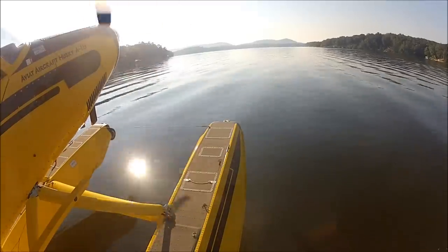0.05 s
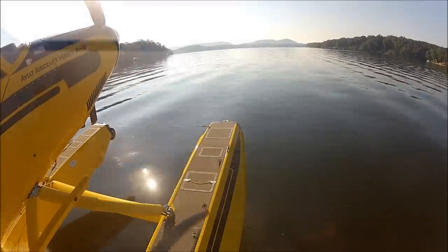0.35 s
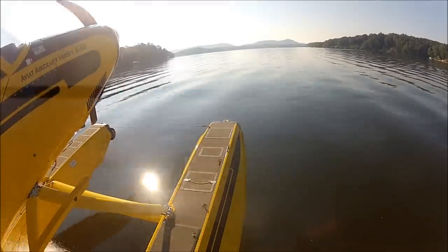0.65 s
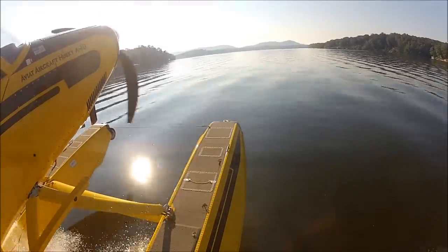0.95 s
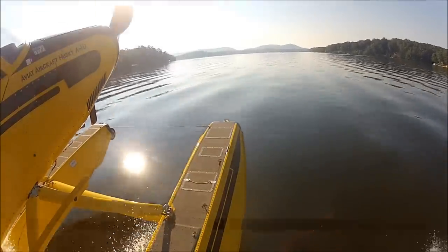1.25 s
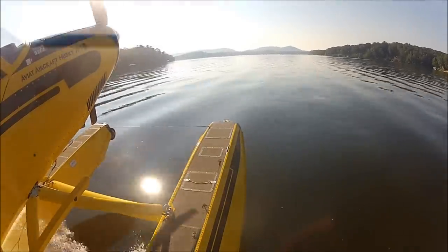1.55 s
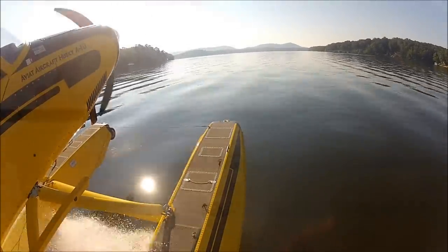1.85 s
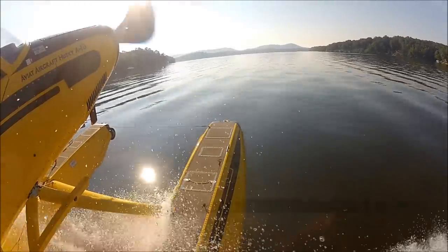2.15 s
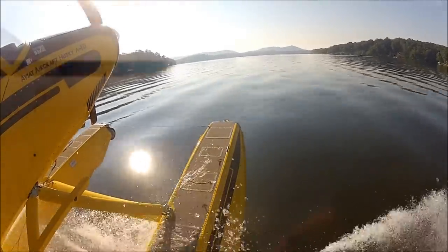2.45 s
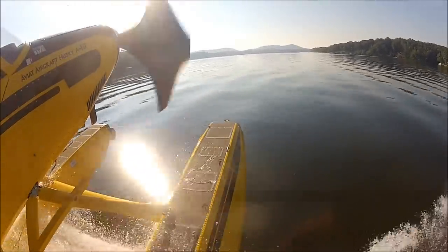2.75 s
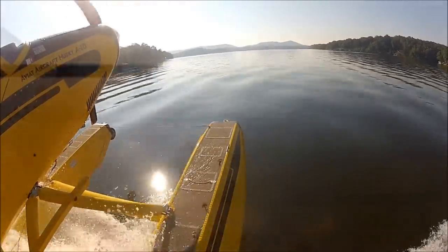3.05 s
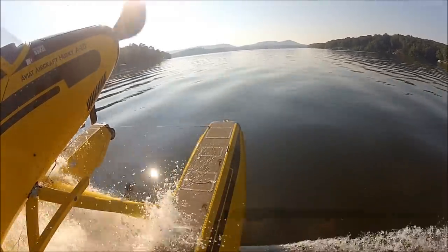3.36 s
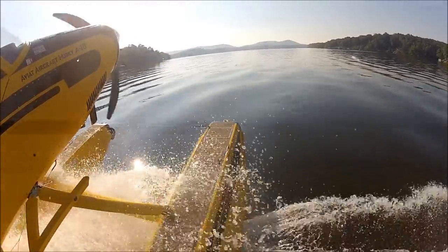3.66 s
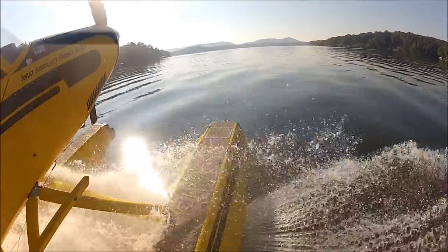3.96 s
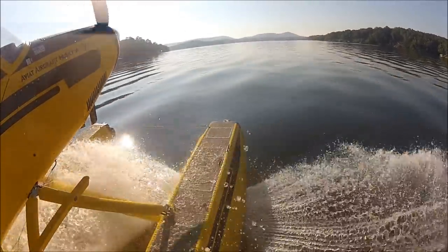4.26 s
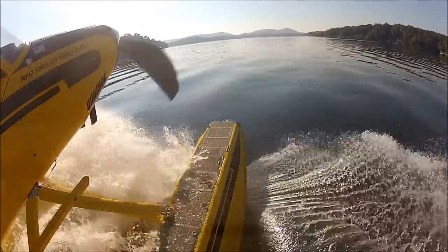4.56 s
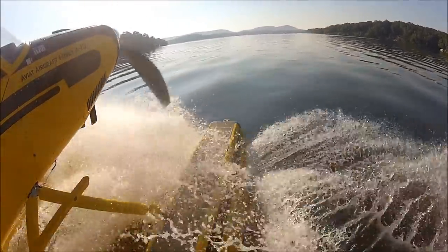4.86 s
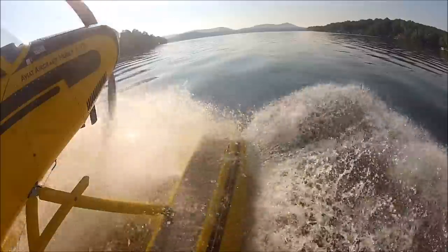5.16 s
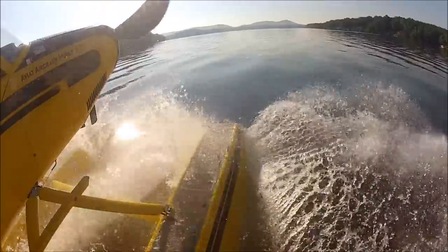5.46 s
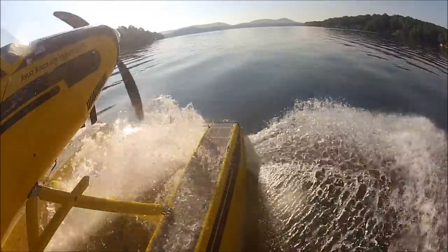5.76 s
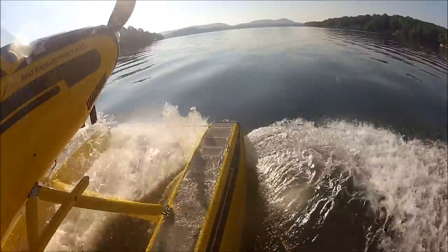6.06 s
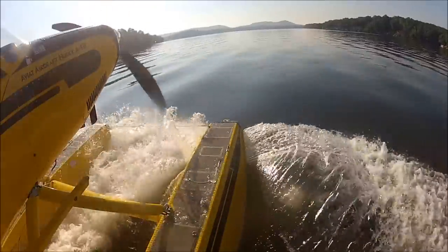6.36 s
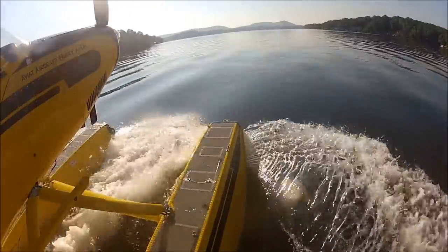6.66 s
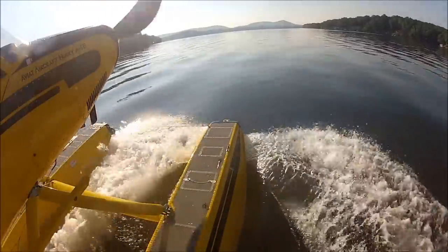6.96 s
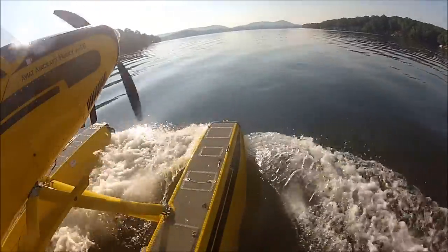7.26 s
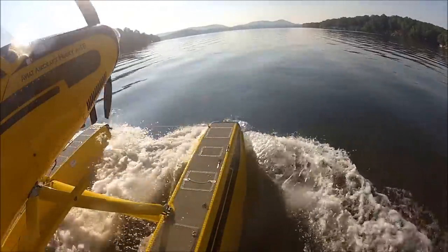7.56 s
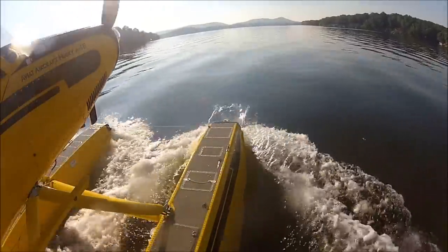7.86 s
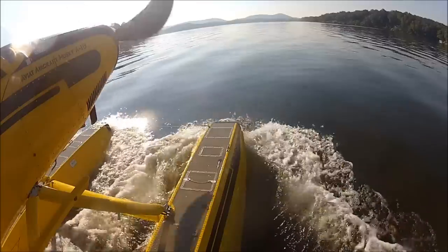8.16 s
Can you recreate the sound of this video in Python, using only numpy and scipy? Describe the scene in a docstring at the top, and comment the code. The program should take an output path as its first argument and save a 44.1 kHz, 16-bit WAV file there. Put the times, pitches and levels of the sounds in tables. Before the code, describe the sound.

A small floatplane settles on a lake, heard close and slightly gritty from inside a plastic case on its strut. From the start, loud gusty wind thumps and rushes against the microphone, while the case rattles rapidly with irregular hard knocks. A soft spray hiss and a faint, low engine drone lie underneath. Water smacks the case sharply at about 3.2 seconds, then a few more times around 4.4 to 4.6 seconds. At that point the wind and rattle drop clearly in level. The throttled-back engine drone comes forward from 4.5 to about 5.7 seconds, along with the hiss of spray, then fades away. The spray recedes after 6 seconds, with a few faint water slaps. From about 6.5 seconds the rattle is a thinner, fast knocking over softer wind, both growing slightly toward the end at 8.3 seconds.

```python
"""A small floatplane settles on a lake, heard from a camera in a plastic case on its wing strut.
Rushing air thumps the case, and each passing propeller blade shoves it against its mount.
The throttled-back engine drones below. The floats cut in, spray hisses and lumps of water
slap the case. As the plane slows, the rattle thins to one knock for each turn of the propeller."""
import sys
import numpy as np
from scipy import signal
from scipy.fft import rfft, irfft
from scipy.io import wavfile
from scipy.ndimage import uniform_filter1d, map_coordinates

SR = 44100
rng = np.random.default_rng(int(sys.argv[2]) if len(sys.argv) > 2 else 0)


def transcribe(u):
    """Save the signal u as a 16-bit wav file named by the first command-line argument.

    u: samples, shape (n,) or (channels, n), limited to [-1, 1]; the rate is SR.
    q: integer samples, one column per channel.
    """
    v = np.clip(np.atleast_2d(u).T, -1, 1)
    q = np.round(v * 32767).astype(np.int16)
    wavfile.write(sys.argv[1], SR, q)


N = 366030
T = np.arange(N) / SR

# How hard the air beats on the case. Each row: time in seconds, level in dB.
AIRFLOW = [(0, -7.5), (.55, -13.5), (.66, -9), (.82, -14), (1.02, -11.5), (1.12, -14.5), (1.42, -9),
           (1.8, -11.5), (2.55, -8), (2.96, -13), (3.19, -8.5), (3.29, -15.5), (4.38, -14), (4.5, -20.5),
           (4.75, -18.5), (5.1, -28), (5.5, -21.5), (5.8, -26.5), (6.16, -17.5), (6.37, -25), (6.52, -22),
           (7.5, -23.5), (7.95, -19), (8.3, -19.5)]
# Air speed. Each row: time in seconds, pitch of the eddies as a ratio, dB added to the rushing air.
AIR_SPEED = [(0, 0.85, -12.5), (.4, 0.78, -13), (.9, 1.043, -7.5), (1.5, 0.89, -9), (2.3, 1.076, -9.5),
             (3.2, 1, -9.5), (3.6, 0.98, -11), (4.6, 1.113, -8.5), (5.4, 1.08, -18), (6.3, 1.004, -11.5),
             (7.2, 0.83, -11), (8.3, 0.79, -13)]
# The engine. Each row: time in seconds, firing and blade pulse rate in Hz, relative level in dB.
ENGINE_RUN = [(0, 75.9, -31), (.9, 72.12, -36), (2.2, 80.14, -38), (3.2, 81.8, -35), (3.4, 69.2, -38),
              (4.3, 69.5, -37), (4.5, 74.85, -21.5), (4.8, 73.17, -28), (5.12, 73.24, -19.5),
              (5.65, 76.98, -29), (6.5, 78.98, -41), (8.3, 74.67, -55)]
# Water thrown up by the floats. Each row: time in seconds, level in dB.
SPRAY_LEVEL = [(0, -29), (.6, -27.5), (2.4, -28), (3.2, -29.5), (3.28, -35.5), (3.45, -26.5), (3.8, -27.5),
               (4.5, -29), (5.1, -27.5), (5.65, -30), (5.78, -29), (5.9, -32.5), (6.8, -37), (7.5, -40.5),
               (8.3, -41.5)]
# Shaking of the mount. Each row: time in seconds, knock strength in dB, dB added for all blades but one.
MOUNT_SHAKE = [(0, -12.5, 2), (.36, -22, -7), (.48, -11.5, -1), (1.03, -11.5, -0.5), (1.11, -19, -7),
               (1.21, -10, -2), (2.4, -10.5, 0.5), (2.93, -11.5, -3), (3.18, -8.5, -1.5), (3.3, -16.5, 1),
               (4.15, -12.5, 0), (4.55, -22, 4), (5.1, -20.5, -5.5), (6.2, -18.5, -5), (6.35, -25, -5),
               (6.55, -15.5, -9), (7.1, -19, -9), (7.65, -17.5, -8.5), (8.3, -16, -20)]
# The hardest knocks of the case on its mount. Each row: start in seconds, strength in dB.
HARD_KNOCKS = [(0.0193, -7), (0.1034, 3), (0.2429, -6), (0.4321, -8), (0.4664, -0.5), (0.4988, -4),
               (0.6582, 0), (0.6699, -1.5), (0.8486, -5), (1.0036, -2), (1.0291, -3), (1.2201, -0.5),
               (1.2538, -2), (1.3984, -3), (1.5318, -4), (1.6992, 3), (1.8387, 1), (2.3748, -7.5),
               (2.3986, -0.5), (2.631, -3), (2.7827, -5), (2.8561, -4), (2.8682, -1), (2.8953, -3),
               (2.985, -6), (3.2066, -1), (3.5203, -5), (3.621, -3.5), (3.855, -8), (4.1456, 0.5),
               (4.6007, -12), (4.7317, -10), (4.8346, -15), (5.216, -15), (5.3016, -11.5), (5.3661, -11),
               (5.5763, -10.5), (5.7702, -15.5), (5.865, -10.5), (6.0272, -13.5), (6.1768, -10.5),
               (6.2143, -10.5), (6.5035, -11), (6.5154, -10), (6.5234, -12), (6.6907, -13.5), (6.7256, -11),
               (6.8337, -13), (6.8711, -9.5), (7.137, -13), (7.2537, -13.5), (7.4436, -11), (7.5067, -13),
               (7.5709, -12), (7.7286, -12), (7.803, -11.5), (7.9402, -9.5), (7.962, -12.5), (8.0082, -9),
               (8.049, -8), (8.0842, -11.5), (8.1702, -9.5)]
# The biggest eddies (swirls of air) to hit the case. Each row: time in seconds, relative level in dB.
BIG_EDDIES = [(0.526, 4), (1.404, -2), (1.5141, 7), (1.9565, 6.5), (2.1897, 0), (2.5197, 5), (2.873, 1),
              (2.9013, 2.5), (3.1004, 3), (3.3584, -0.5), (3.444, -1.5), (3.795, -2.5), (3.8522, -3),
              (4.2, -2.5), (4.7283, -6), (4.768, -4), (4.8324, -7.5), (4.9572, -5.5), (4.982, -6),
              (5.2143, -9), (5.3629, -10), (5.4026, -8), (5.5363, -11), (7.02, -9.5), (7.189, -11.5),
              (7.254, -11.5), (7.948, -6)]
# Water hitting the case. Each row: start in seconds, level in dB, pitch in Hz,
# fade time in seconds before damping shortens it.
WATER_SLAPS = [(3.2452, 0, 650, 0.0033), (4.386, -3, 320, 0.005), (4.402, -12.5, 699, 0.016),
               (4.523, -33, 5660, .005), (4.547, -14, 510, 0.0037), (4.594, -31, 5600, .005),
               (4.599, -7, 461, 0.0025), (5.771, -20, 2550, 0.0046), (6.172, -23.5, 816, 0.017),
               (6.435, -26.5, 1097, 0.017), (8.1, -26, 1050, 0.0086)]
# The tones at which the case rings. Each row: pitch in Hz, width in Hz, boost in dB.
CASE_RINGS = [(489, 180, 9), (636, 76, 5.5), (846, 200, 10), (1090, 88, 9), (1430, 180, 8.5),
              (1864, 200, 7), (2194, 85, 8.5), (2593, 190, 9.5), (3286, 526, 12), (3615, 195, 13),
              (4086, 250, 9), (5330, 130, 6.5)]
# The tone of the plastic, eddies, rushing air, spray and hollow floats.
# Each row: frequency in Hz, relative level in dB.
CASE_TONE = [(100, 17.5), (500, 8.5), (1250, -1.5), (2200, 3), (3000, -8.5), (4000, -2.5), (5400, -6)]
EDDY_TONE = [(15, -46), (30, -16), (65, -15), (105, -1), (140, -1), (175, 2), (220, -2.5), (350, -16),
             (600, -23), (1200, -32.5), (4000, -73.5)]
AIR_TONE = [(100, -6), (300, 4.5), (500, -6), (720, -11.5), (1260, -15.5), (2200, -18.5), (3000, -37),
            (5500, -43)]
SPRAY_TONE = [(100, -14.5), (400, 0.5), (1080, 3), (1260, -6), (1480, 1.5), (2200, 0.5), (2400, -1.5),
              (2630, 1), (2950, -4.5), (3700, -11), (5500, -14)]
FLOAT_TONE = [(15, -13), (30, -9.5), (50, 5), (85, -1), (125, 5), (250, -14), (600, -40), (2000, -74)]


def undb(db):
    """Turn decibels into a number to multiply by."""
    return 10 ** (np.asarray(db) / 20)


def curves(table):
    """Join the rows with straight lines, so each column after the time has a value per sample."""
    times, *columns = np.transpose(table)
    return [np.interp(T, times, column) for column in columns]


def unit(x):
    """Scale a signal to an average power of 1."""
    return x / np.sqrt(np.mean(x ** 2))


def add(track, start_s, sound):
    """Mix a sound into the track from the given time."""
    i = int(np.clip(start_s * SR, 0, N - 1))
    track[i:i + len(sound)] += sound[:N - i]


def colour(x, tone, rings=(), size=8192):
    """Filter a sound to give it a broad tone, with any ringing pitches on top."""
    freqs = np.maximum(np.fft.rfftfreq(size, 1 / SR), 1)
    hz, db = np.transpose(tone)
    shape_db = np.interp(np.log(freqs), np.log(hz), db)
    for centre, width, boost in rings:
        shape_db += boost / (1 + (2 * (freqs - centre) / width) ** 2)
    # make the filter ring only after a hit, never before it
    cepstrum = irfft(np.log(undb(shape_db)))
    one_sided = 2 * cepstrum[:size // 2] * (np.arange(size // 2) > 0)
    ring = irfft(np.exp(rfft(one_sided, size)))
    return signal.fftconvolve(x, ring / np.linalg.norm(ring))[:N]


def wander(per_s):
    """A smooth curve through per_s random values a second, with a spread of 1."""
    points = rng.standard_normal(4096)
    return unit(map_coordinates(points, [T * per_s], order=3, mode="wrap"))


def turbulence(per_s, depth_db):
    """Noise whose strength flutters at about the given rate."""
    return unit(rng.standard_normal(N) * undb(depth_db * wander(per_s)))


def eddy_pulses(per_s=150, spread_db=4.5, count=4096):
    """Eddies peel off the strut as little pulses of suction, uneven in size and spacing."""
    times = np.cumsum(rng.gamma(2, .5 / per_s, count))
    sizes = undb(spread_db * rng.standard_normal(count))
    return -unit(np.bincount((times * SR).astype(int), sizes, minlength=N)[:N])


def wind(gust, gust_db=2.0, boom_db=-0.9, swirl_db=-5, steadying=0.28):
    """Eddies thump the case, deeper in slower air; smaller ones rush above them and make it ring."""
    airflow_db, = curves(AIRFLOW)
    speed, rush_db = curves(AIR_SPEED)
    pressure = colour(eddy_pulses() + undb(swirl_db) * rng.standard_normal(N), EDDY_TONE)
    boom = map_coordinates(pressure, [np.cumsum(speed)], order=3, mode="mirror")  # pitch follows speed
    # the air feeds the eddies at a steady power, so strong ones are followed by weaker ones
    boom = unit(boom / uniform_filter1d(boom ** 2, size=3000) ** (steadying / 2))
    # the rush swells with each thump
    swell = np.sqrt(uniform_filter1d(boom ** 2, size=300) + .5)
    rush = unit(colour(swell * turbulence(300, depth_db=3.0), AIR_TONE, CASE_RINGS))
    return undb(airflow_db + gust_db * gust) * (undb(boom_db) * boom + undb(rush_db) * rush)


def engine(rolloff_db=-7, rough_db=3.0, harmonics=5, waver=0.01184):
    """The firing engine makes a low note with overtones, which waver in the rushing air."""
    hz, db = curves(ENGINE_RUN)
    phase = 2 * np.pi * np.cumsum(hz * (1 + waver * wander(16))) / SR
    drone = np.zeros(N)
    for k in range(harmonics):
        drone += undb(rolloff_db * k - rough_db * wander(34)) * np.sin((k + 1) * phase)
    return unit(drone) * undb(db - 3)


def spray(drops_per_s=5000, drops_db=-3, rumble_db=-27):
    """Sheets of water hiss off the floats and break into fine drops; the hollow floats rumble."""
    spray_db, = curves(SPRAY_LEVEL)
    drops = unit((rng.random(N) < drops_per_s / SR) * rng.standard_normal(N))
    hiss = unit(colour(turbulence(60, depth_db=2.0) + undb(drops_db) * drops, SPRAY_TONE))
    rumble = unit(colour(turbulence(15, depth_db=2.0), FLOAT_TONE))
    return hiss * undb(spray_db) + rumble * undb(rumble_db)


def blade_knocks(gust, blades=3, gust_db=2.1, jitter_s=.0015, spread_db=5.0,
                 bounce_chance=.35, bounce_s=.006, bounce_db=-4, recover_s=.008):
    """Each passing blade shoves the case, which may bounce. Each row: start in seconds, strength in dB."""
    hz, _ = curves(ENGINE_RUN)
    shake_db, others_db = curves(MOUNT_SHAKE)
    passes = np.flatnonzero(np.diff(np.floor(np.cumsum(hz) / SR)))
    scatter, luck = rng.standard_normal((1024, 2)), rng.random((1024, 2))
    hard_times = np.array(HARD_KNOCKS)[:, 0]
    knocks = []
    for k, (i, (late, size), (dice, flight)) in enumerate(zip(passes, scatter, luck)):
        start = T[i] + jitter_s * late
        if np.abs(hard_times - start).min() < recover_s:
            continue  # a hard knock throws the case clear
        db = shake_db[i] + others_db[i] * (k % blades > 0)
        db += gust_db * gust[i] + spread_db * min(size, 1)
        knocks.append((start, db))
        if dice < bounce_chance:
            knocks.append((start + bounce_s * (.5 + flight), db + bounce_db))
    return knocks


def rattle(gust, lean_s=0.0031, contact_s=0.0025, scrape_s=0.0019, scrape=0.065,
           click_db=12, lean_db=-4, contact_db=-5, rebound=0.18):
    """The case leans, snaps against its mount, stays a moment and drops back; the plastic rings."""
    snaps, rocking, t = np.zeros(N), np.zeros(N), T[:512]
    grits, holds = rng.standard_normal((1400, len(t))), .5 + rng.random(1400)
    click = t == 0
    lean = np.sin(np.pi * np.minimum(t / lean_s, 1) ** 2)
    contact = -np.sqrt(np.maximum(1 - t / contact_s, 0)) * (1 - np.exp(-t / 0.00034))
    for (start, db), grit, hold in zip(list(HARD_KNOCKS) + blade_knocks(gust), grits, holds):
        add(snaps, start, undb(db) * (scrape * grit * np.exp(-t / scrape_s) - click))
        add(snaps, start + contact_s * hold, undb(db) * rebound * click)
        add(rocking, start - lean_s, undb(db + lean_db) * lean)
        add(rocking, start, undb(db + contact_db) * contact)
    airflow_db, = curves(AIRFLOW)
    sway = undb(0.25 * (airflow_db + 12))  # weaker air leans the case less, so knocks thin to ticks
    return undb(click_db) * colour(snaps, CASE_TONE, CASE_RINGS) + rocking * sway


def stray_eddies(per_s=5, above_airflow_db=6, spread_db=6.0, count=96):
    """Lesser eddies come at random, stronger in strong air. Each row: time in seconds, level in dB."""
    airflow_db, = curves(AIRFLOW)
    place, size = rng.random((count, 2)).T
    times = (np.arange(count) + place) / per_s
    levels = np.interp(times, T, airflow_db) + above_airflow_db + spread_db * (2 * size - 1)
    return [(time, db) for time, db in zip(times, levels) if time < T[-1]]


def eddy_thumps(base_hz=205, rise_cycles=0.26, tail_cycles=0.46, gain_db=1.0, puff_db=-15):
    """A big eddy is a sudden dip in pressure with a puff of noise; the case swings briefly after it."""
    thumps, puffs, t = np.zeros(N), np.zeros(N), np.arange(-512, 1024) / SR
    speed, _ = curves(AIR_SPEED)
    noises, detunes = rng.standard_normal((128, len(t))), np.exp(0.11 * rng.standard_normal(128))
    for (time, db), noise, detune in zip(list(BIG_EDDIES) + stray_eddies(), noises, detunes):
        cycles = t * base_hz * np.interp(time, T, speed) * detune
        width = np.where(t < 0, rise_cycles, tail_cycles)
        swell = undb(db + gain_db) * np.exp(-.5 * (cycles / width) ** 2)
        add(thumps, time + t[0], -np.cos(2 * np.pi * cycles) * swell)
        add(puffs, time + t[0], noise * swell)
    return thumps + undb(puff_db) * colour(puffs, AIR_TONE, CASE_RINGS)


def water_slaps(splatter_db=-5.0, damping=2.23, roughness=0.095):
    """A lump of water gives a hollow smack whose pitch breaks up at once, with a burst of splatter."""
    smacks, bursts, t = np.zeros(N), np.zeros(N), T[:4096]
    for start, db, hz, fade_s in WATER_SLAPS:
        age = damping * t / fade_s
        swell = undb(db) * age * np.exp(1 - age)
        wobble = roughness * np.cumsum(rng.standard_normal(len(t)))
        add(smacks, start, swell * np.sin(2 * np.pi * hz * t + wobble))
        add(bursts, start, swell * rng.standard_normal(len(t)))
    splatter = colour(bursts, tone=[(200, 3.5), (850, 2.5), (1400, -12.0), (2500, -16), (5500, -34)])
    return smacks + undb(splatter_db) * splatter


def scene():
    """One microphone in the case hears it all; the same quick gusts swell the wind and the rattle."""
    gust = np.minimum(wander(10), 1.5)
    return (wind(gust) + eddy_thumps() + rattle(gust) + engine() + spray() + water_slaps())[None]


def record(dry, hardness=6, camera_rate_hz=12000, top_hz=15300):
    """The camera drops the deepest rumble, rounds off the loudest peaks and samples at a low rate."""
    x = signal.sosfilt(signal.butter(2, 22, "high", fs=SR, output="sos"), dry[0])
    x = x / (1 + np.abs(x) ** hardness) ** (1 / hardness)
    x = signal.sosfiltfilt(signal.butter(12, 5750, fs=SR, output="sos"), x)
    # each sample is held until the next: the steps mirror the whole sound into a gritty treble
    steps = np.repeat(signal.resample(x, round(N * camera_rate_hz / SR)), 4)
    top_cut = signal.ellip(8, .2, 70, top_hz, fs=SR, output="sos")
    return signal.sosfilt(top_cut, signal.resample(steps, N))[None]


dry = scene()
out = record(dry)
transcribe(out)
```